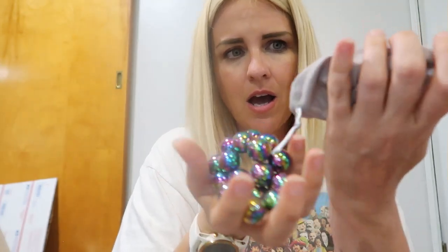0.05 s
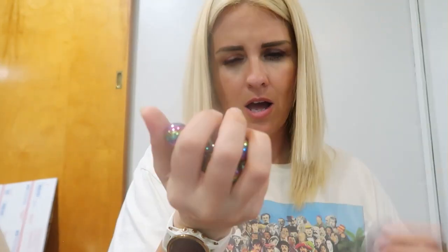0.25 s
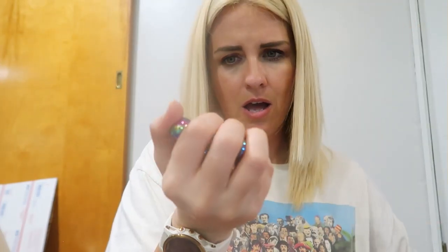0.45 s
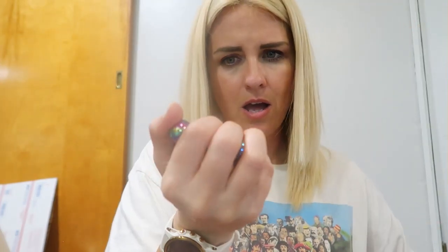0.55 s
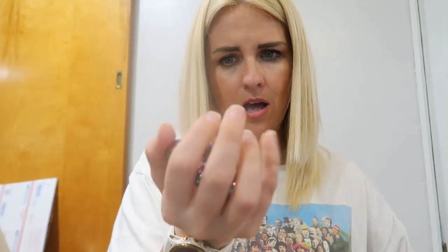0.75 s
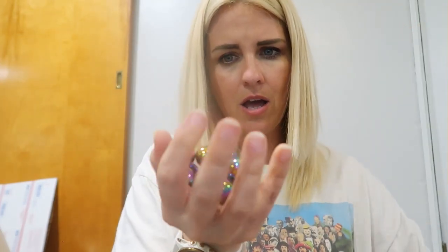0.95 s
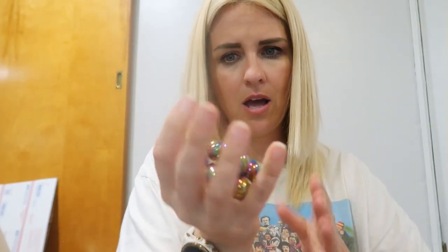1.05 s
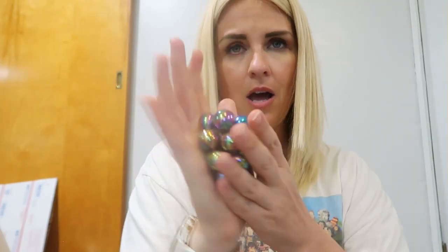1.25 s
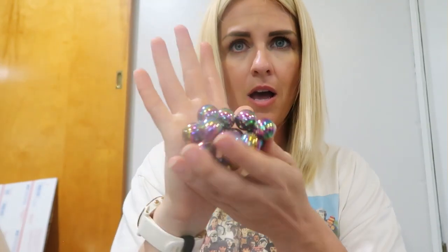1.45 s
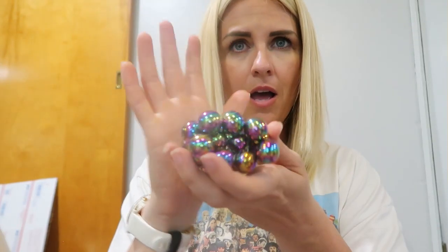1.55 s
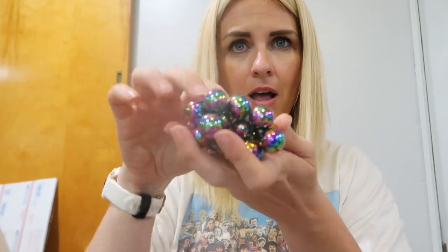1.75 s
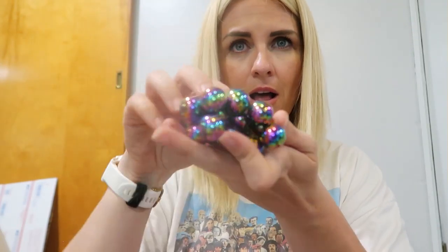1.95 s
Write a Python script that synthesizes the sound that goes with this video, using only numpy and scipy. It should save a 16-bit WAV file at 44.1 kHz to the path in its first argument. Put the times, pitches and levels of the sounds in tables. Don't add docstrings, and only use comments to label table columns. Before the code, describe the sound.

Close, dry clicks of small metal balls snapping together in the hands, dense and loud in the first second, lighter afterward, with a faint skin rub, short hard-room reverberation and a low steady fan hum.

```python
import sys
import numpy as np
from scipy import signal
from scipy.fft import rfft, irfft
from scipy.io import wavfile
from scipy.ndimage import uniform_filter1d, minimum_filter1d, map_coordinates

SR = 44100
rng = np.random.default_rng(int(sys.argv[2]) if len(sys.argv) > 2 else 0)


def volts_from_decibels(level):
    exponent = np.asarray(level, float) / 20
    return 10 ** exponent


def file_out(sig):
    cols = np.atleast_2d(sig).T
    lim = np.clip(cols, -1, 1)
    pcm = np.round(lim * 32767).astype(np.int16)
    wavfile.write(sys.argv[1], SR, pcm)


N = 88200

# (frequency [Hz], rms level [dB])
HUM_LINES = [(69, -57.5), (120, -42.5), (240, -52.5)]
HUM_WOBBLE_DB, HUM_DRIFT_RAD = -0.5, 0.086

# (frequency [Hz], density [dB])
AIR_COLOUR = [(20, -21.5), (65, -3.5), (140, -5), (185, -12), (450, -11), (800, -21.5), (5500, -33),
              (14000, -53)]
# (frequency [Hz], likeness [0-1])
AIR_ALIKE = [(60, 1), (130, 0.95), (290, 0.85), (640, 0.06), (1400, 0.76), (3100, 0.046), (15000, 0.017)]
AIR_DB, AIR_PATCHY_DB = -46, 0.7

# (time [s], peak level [dB], palm hollow [Hz], brightness [dB])
OPEN_CONTACTS = [(0.107, -18.5, 2700, -20), (0.1079, -20, 3500, -25), (0.1088, -21, 3150, -19.5),
                 (0.2382, -1, 1840, -2), (0.2388, -5, 1420, -19.5), (0.2385, -1, 3470, -2),
                 (0.2401, -7.5, 2210, -18), (.2400, 0, 3100, -13), (0.3207, -19, 3500, -16),
                 (.3224, -7.5, 3700, -5), (0.3235, -9.5, 2510, -16), (0.3242, -11.5, 2800, -20),
                 (0.3621, -4, 3070, -5), (.3626, -7, 3100, -16), (0.3639, -11.5, 3830, -12),
                 (0.411, -19, 4620, -9), (0.411, -7.5, 3980, -12), (0.4116, -17, 2270, -10),
                 (0.565, -16.5, 3000, 14), (0.5636, -20.5, 3920, -9), (0.5657, -17, 2460, -18),
                 (.5670, -21, 2420, -18), (1.8166, -13.5, 2480, 1), (1.8170, -5.5, 4240, -14.5),
                 (1.8172, -13, 2980, -15), (1.8192, -12, 3100, -13), (1.8201, -15.5, 3860, -19),
                 (1.8236, -20, 3940, -6)]
# (time [s], peak level [dB], palm hollow [Hz], brightness [dB])
FIST_CONTACTS = [(0.774, -5, 2540, -10.5), (0.7739, -18, 3600, -12), (.7748, -8, 3420, -8),
                 (0.7752, -35, 2600, -10), (.7776, -13.5, 3830, -5), (0.7815, -25, 2720, -14),
                 (0.7821, -15, 3430, -10), (.7840, -16.5, 3400, -19), (.9300, -33, 4200, -10),
                 (0.9335, -3.5, 2500, 5), (0.9338, -2, 2400, -13), (.9353, -10.5, 2550, -17),
                 (0.9358, -6, 2590, -17.5), (.9370, -8.5, 2880, 2), (0.9384, -17.5, 2730, -10),
                 (0.939, -12, 3480, -1), (0.9424, -17, 4300, -8), (0.9433, -11, 4740, -7),
                 (0.9435, -18, 3030, -18), (0.9467, -17.5, 2630, -10), (0.9476, -21, 2930, -25),
                 (0.9476, -18.5, 2540, 7), (0.9492, -9.5, 2600, -15)]
# (time [s], peak level [dB], palm hollow [Hz], brightness [dB], chain length [ms])
SNAP_CHAINS = [
    (0.2037, -25, 3400, -19, 0.43),
    (0.5044, -12, 3700, -20.5, 2.3),
    (1.3553, -28.5, 3550, -11, 1.2),
    (1.3682, -17, 3450, -25.5, 1.04),
    (1.7009, -16.5, 3200, -29, 1.6),
    (1.7003, -24.5, 5880, -29, 0.48),
]
# (time [s], peak level [dB], palm hollow [Hz], brightness
# [dB], chain length [ms])
MORE_CHAINS = [(.2200, -26.5, 2400, -22.5, 0.54), (.541, -36, 4000, -12, 1.2),
               (.549, -33, 3980, -12, 2.05), (.706, -42, 2320, -40, 1), (0.7541, -32, 2320, -12, 12),
               (0.7669, -20.5, 3650, -15, 1.2), (0.843, -32, 3470, -31, 1.7),
               (1.33, -37.5, 3400, -23, 1.64), (1.3585, -32.5, 3400, -32, 1.56),
               (1.409, -38.5, 3100, -15, 4.1), (0.1516, -40, 3000, -1, 0.33),
               (1.4391, -46, 3550, -11, 1.25), (1.447, -31, 2720, -18, 1.74),
               (1.511, -30, 3410, -25, 2.5), (1.5189, -29, 3100, -8, 1.97),
               (1.6747, -21.5, 3430, -26, 0.55), (1.87, -23, 3250, -6, 2.2)]
CONTACT_T60_S = 0.0066
SAME_SNAP_S = 0.015
FIST_ROOM_DB = 3.5

# (frequency [Hz], level [dB], decay t60 [s])
STEEL_MODES = [(5830, -2.5, 0.0069), (6520, -4.5, 0.0078), (7540, 0, 0.008), (8700, -12, 0.0056),
               (11360, -10, 0.0041), (14600, -22.5, 0.0014)]
# (frequency [Hz], level [dB], decay t60 [s])
CLUMP_MODES = [(1950, -16, 0.01), (2400, -6.5, 0.022), (3100, 6, 0.0013), (3560, 21, 0.0013),
               (4300, -38, 0.0046)]
CLUMP_FOLLOWS = 0.86
HOLLOW_SPREAD, HOLLOW_DB = 0.0093, -1.5
HOLLOW_T60_S, HOLLOW_RISE_S = 0.007, 0.0005
MODE_SPREAD, MODE_SCATTER_DB, MODE_RISE_S = 0.074, 1.5, 0.00015
CONTACT_SCATTER_DB, CHAIN_FADE_DB = -2, 3
STEEL_FADE_DB = 28
BASS_CUT_HZ = 1790

# (frequency [Hz], side relative to mid [dB])
SIDE_LEVEL = [(1500, -27), (4000, -22.5), (8000, -10.5), (14000, -0.5)]
# (frequency [Hz], decay t60 [s])
ROOM_DECAY = [(1000, 0.41), (2500, 0.41), (6000, 0.3), (12000, 0.35)]
# (frequency [Hz], level [dB])
ROOM_COLOUR = [(1200, -15.5), (2400, -5), (3300, -8), (4600, -4.5), (6000, 8), (8500, 2), (10500, 2.5),
               (14000, 7)]
# (frequency [Hz], likeness [0-1])
ROOM_ALIKE = [(1400, 1), (3100, 1), (6800, 0.1), (14000, 0.033)]
ROOM_DB, ROOM_START_S = -8.5, 0.00094
WALL_S, WALL_LONG_S, WALL_DB, SLAP_DB = 0.0069, 0.0049, -8.5, -15
BLUR_HZ = 1800

# (time [s], palm hollow [Hz], level [dB])
CLOSING = [
    (.54, 1750, -68),
    (.6, 1816, -56),
    (.66, 1860, -60),
    (.74, 1800, -59.5),
    (.78, 1810, -75),
]
# (time [s], palm hollow [Hz], level [dB])
OPENING = [
    (1.0, 2400, -70),
    (1.07, 2600, -58),
    (1.14, 2900, -53),
    (1.19, 3020, -56.5),
    (1.26, 3000, -65),
    (1.33, 3100, -65),
]
CLOSING_WIDE_HZ, OPENING_WIDE_HZ = 110, 170

# (frequency [Hz], level [dB])
STARVED_LIMIT = [(8200, -112), (9000, -89), (10500, -85.5), (13000, -81.5), (16500, -77)]
# (frequency [Hz], level [dB])
CALM_LIMIT = [(6000, -115), (9000, -100), (12000, -103), (14500, -104), (15500, -92)]
STARVED_S, STARVE_LAG_S = 0.17, 0.022
STARVE_FOLLOWS, LOUD_DB = 1.5, -11.5

MIC_TOP_HZ, CEILING = 16000, 0.97


def along(points, hz):
    f, v = np.transpose(points)
    return np.interp(np.log(hz + 1), np.log(f + 1), v)


def unit(x):
    return x / np.sqrt(np.mean(x ** 2) + 1e-20)


def wobble(rate):
    knots = rng.standard_normal(int(N * rate / SR) + 4)
    return map_coordinates(knots, [np.arange(N) * rate / SR])


def paired(pair, colour, alike):
    hz = np.fft.rfftfreq(pair.shape[1], 1 / SR)
    turn = np.arccos(np.clip(along(alike, hz), -1, 1)) / 2
    spectra = rfft(pair) * volts_from_decibels(along(colour, hz)) * [np.cos(turn), np.sin(turn)]
    mid, side = irfft(spectra, pair.shape[1])
    return np.array([mid + side, mid - side])


def hum():
    t = np.arange(N) / SR
    total = np.zeros(N)
    for hz, db in HUM_LINES:
        level = np.sqrt(2) * volts_from_decibels(db + HUM_WOBBLE_DB * wobble(4.78))
        total += level * np.sin(2 * np.pi * hz * t + HUM_DRIFT_RAD * wobble(6.46))
    return total


def air():
    z = signal.stft(rng.standard_normal((2, N)), nperseg=512)[2]
    field = uniform_filter1d(rng.standard_normal(z.shape[1:]), 6, 0)
    field = uniform_filter1d(field, 14, 1)
    pair = signal.istft(z * volts_from_decibels(AIR_PATCHY_DB * unit(field)), nperseg=512)[1][:, :N]
    return volts_from_decibels(AIR_DB) * unit(paired(pair, AIR_COLOUR, AIR_ALIKE))


def ring(t, hz, t60, rise):
    t = np.maximum(t, 0)
    return np.sin(2 * np.pi * hz * t) * volts_from_decibels(-60 * t / t60) * (1 - np.exp(-t / rise))


def snap(hollow_hz, bright_db, long_ms, hollow_t60, count):
    steps = np.arange(1, count) + rng.uniform(-1, 0, count - 1)
    place = np.r_[0, steps / max(count - 1, 1)][:, None]
    t = np.arange(768) / SR - long_ms / 1000 * place

    def scatter():
        return rng.standard_normal((count, 1))

    hollow = hollow_hz * np.exp(HOLLOW_SPREAD * scatter())
    sound = volts_from_decibels(HOLLOW_DB) * ring(t, hollow, hollow_t60, HOLLOW_RISE_S)
    modes = [(hz, db + CLUMP_FOLLOWS * bright_db, t60) for hz, db, t60 in CLUMP_MODES]
    modes += [(hz, db + bright_db - STEEL_FADE_DB * place, t60) for hz, db, t60 in STEEL_MODES]
    for hz, db, t60 in modes:
        level = volts_from_decibels(db + MODE_SCATTER_DB * scatter())
        sound = sound + level * ring(t, hz * np.exp(MODE_SPREAD * scatter()), t60, MODE_RISE_S)
    force = volts_from_decibels(CONTACT_SCATTER_DB * scatter() - CHAIN_FADE_DB * place)
    sound = (sound * np.sign(scatter()) * force).sum(0)
    sound = signal.sosfilt(signal.butter(3, BASS_CUT_HZ, 'high', fs=SR, output='sos'), sound)
    return sound / abs(sound).max()


def all_round(sound):
    power = uniform_filter1d(abs(rfft(sound)) ** 2, max(1, round(BLUR_HZ * len(sound) / SR)))
    return np.roll(irfft(np.sqrt(abs(power)), len(sound)), 64)


def room():
    length = SR // 2
    hz, t, z = signal.stft(rng.standard_normal((2, length)), SR, nperseg=128)
    decay = volts_from_decibels(-60 * t / along(ROOM_DECAY, hz)[:, None])
    tail = signal.istft(z * decay, SR, nperseg=128)[1][:, :length]
    t = np.arange(length) / SR
    tail *= np.clip(t / ROOM_START_S, 0, 1) ** 2
    onset = np.clip((t - WALL_S) * 2000, 0, 1)
    wall = rng.standard_normal((2, length)) * onset / (1 + (abs(t - WALL_S) / WALL_LONG_S) ** 8)
    wall[:, round(WALL_S * SR)] += volts_from_decibels(SLAP_DB - WALL_DB) * np.linalg.norm(wall[0])
    tail = volts_from_decibels(ROOM_DB) * tail / np.linalg.norm(tail[0])
    wall = volts_from_decibels(WALL_DB) * wall / np.linalg.norm(wall[0])
    return paired(tail + wall, ROOM_COLOUR, ROOM_ALIKE)


def balls():
    out, last = np.zeros((2, N + SR)), -1
    singles = [(*row, 0, 1, CONTACT_T60_S) for row in FIST_CONTACTS + OPEN_CONTACTS]
    chains = [(*row, 4, HOLLOW_T60_S) for row in SNAP_CHAINS + MORE_CHAINS]
    for k, (s, db, hollow_hz, bright_db, long_ms, count, t60) in enumerate(singles + chains):
        mid = volts_from_decibels(db) * snap(hollow_hz, bright_db, long_ms, t60, count)
        hz = np.fft.rfftfreq(len(mid), 1 / SR)
        delay = np.exp(-2j * np.pi * hz * rng.uniform(0, 0.00021))
        side = irfft(rfft(mid) * volts_from_decibels(along(SIDE_LEVEL, hz)) * delay, len(mid))
        if k >= len(singles) or abs(s - last) > SAME_SNAP_S:
            answer = room()
        last = s
        wet = signal.fftconvolve(all_round(mid)[None], answer, axes=1)
        if k < len(FIST_CONTACTS):
            wet = wet * volts_from_decibels(FIST_ROOM_DB)
        at = round(s * SR)
        out[:, at:at + len(mid)] += [mid + side, mid - side]
        out[:, at:at + wet.shape[1]] += wet
    return out[:, :N]


def skin(rows, wide_hz):
    s, hz, db = np.transpose(rows)
    t = np.arange(N) / SR
    low = signal.butter(2, wide_hz, fs=SR, output='sos')
    band = signal.sosfilt(low, rng.standard_normal((2, N)))
    turn = 2 * np.pi * np.cumsum(np.interp(t, s, hz)) / SR
    rub = unit(band[0] * np.cos(turn) + band[1] * np.sin(turn))
    return volts_from_decibels(np.interp(t, s, db, -120, -120) + 1.4 * wobble(41.15)) * rub


def treble_dropout(x):
    hz, t, z = signal.stft(x, SR, nperseg=1024)
    memory = round(STARVED_S * SR)
    peak = -minimum_filter1d(-abs(x).max(0), size=memory | 1, origin=memory // 2, mode='constant')
    recent_db = 20 * np.log10(np.interp(t - STARVE_LAG_S, np.arange(N) / SR, peak) + 1e-9)
    power = abs(z[:, 1:]) ** 2
    bands = power.reshape(2, -1, 16, len(t)).mean(2).repeat(16, 1)
    fine = uniform_filter1d(power, size=3, axis=1)
    relief_db = STARVE_FOLLOWS * np.minimum(recent_db - LOUD_DB, 0)
    starved = volts_from_decibels(along(STARVED_LIMIT, hz[1:])[:, None] + relief_db) ** 2
    calm = volts_from_decibels(along(CALM_LIMIT, hz[1:]))[:, None] ** 2
    z[:, 1:] *= (bands > starved) * (fine > calm)
    return signal.istft(z, SR, nperseg=1024)[1][:, :N]


def scene():
    rubbing = skin(CLOSING, CLOSING_WIDE_HZ) + skin(OPENING, OPENING_WIDE_HZ)
    return hum() + air() + balls() + rubbing


def band_limit(x):
    return signal.sosfilt(signal.butter(12, 16660, fs=SR, output="sos"), x)


def record(dry):
    hz = np.fft.rfftfreq(N, 1 / SR)
    picked_up = irfft(rfft(dry) / (1 + (hz / MIC_TOP_HZ) ** 24), N)
    limited = picked_up / (1 + abs(picked_up / CEILING) ** 6) ** (1 / 6)
    mix = treble_dropout(limited)
    return band_limit(mix)


dry = scene()
out = record(dry)
file_out(out)
```